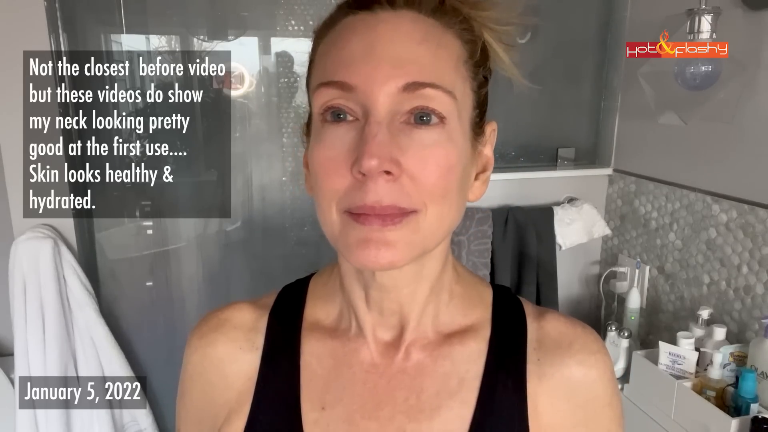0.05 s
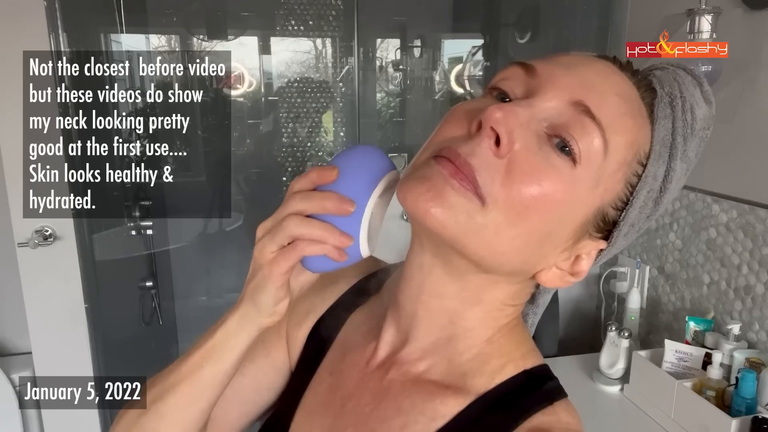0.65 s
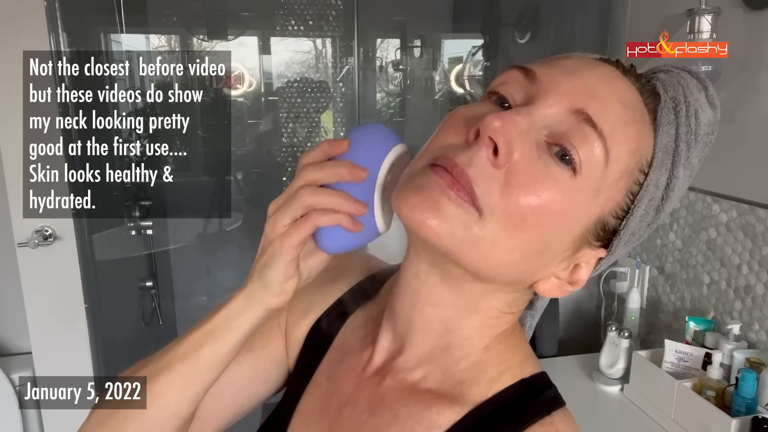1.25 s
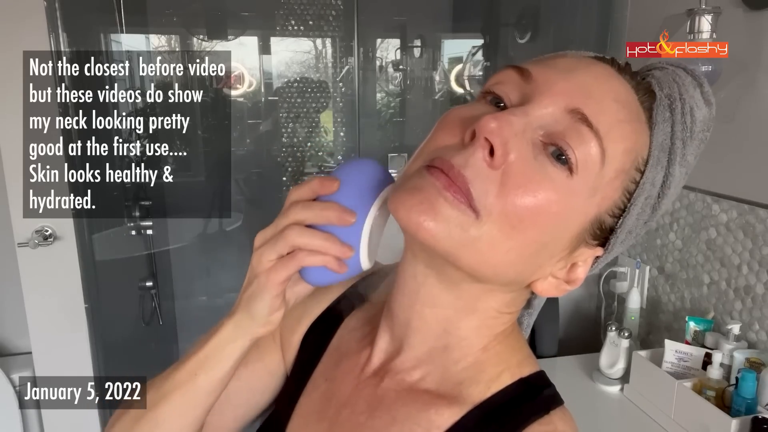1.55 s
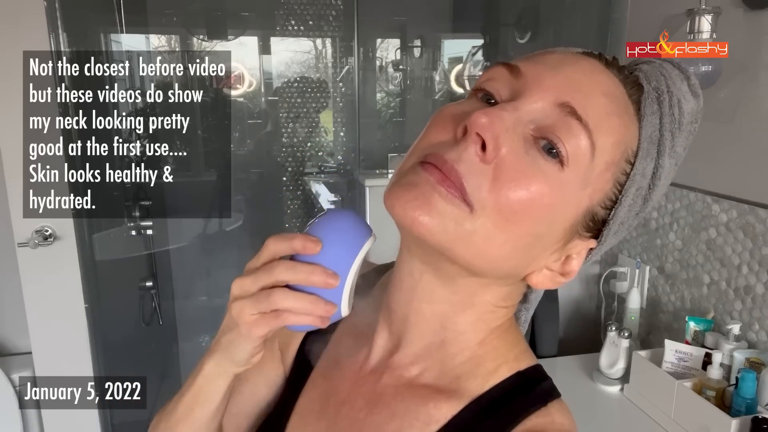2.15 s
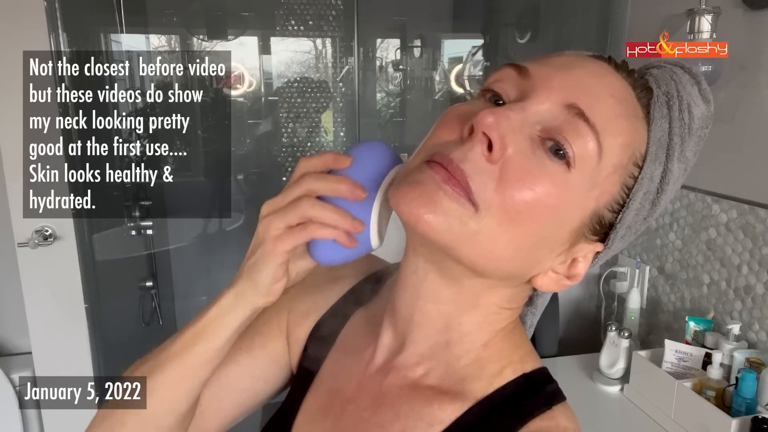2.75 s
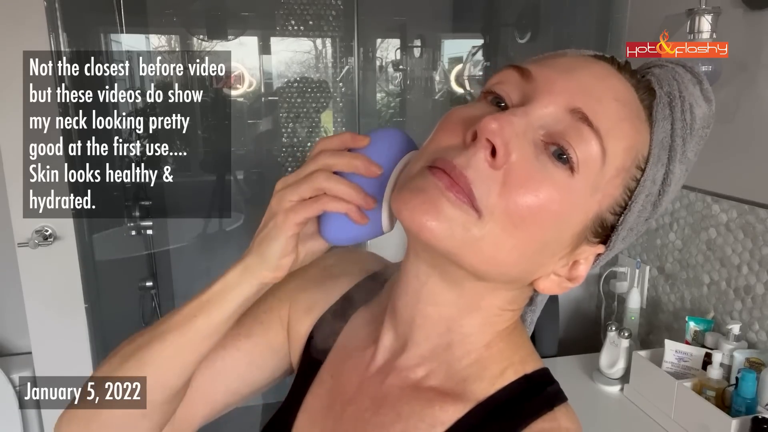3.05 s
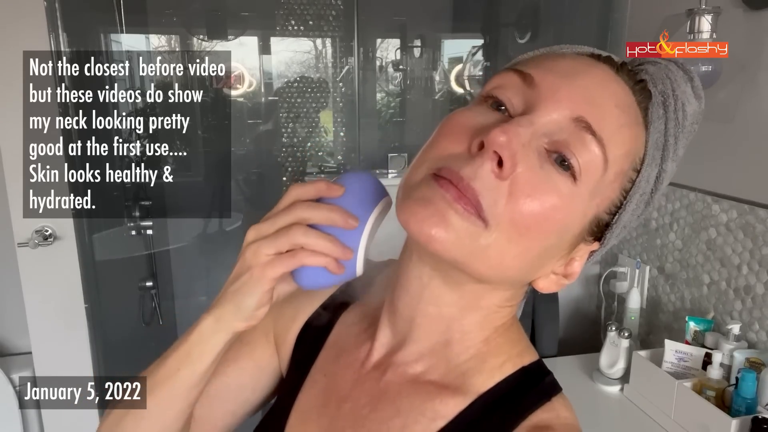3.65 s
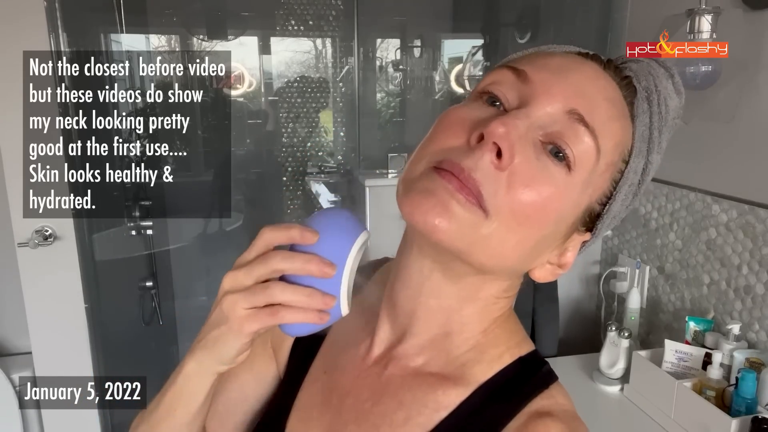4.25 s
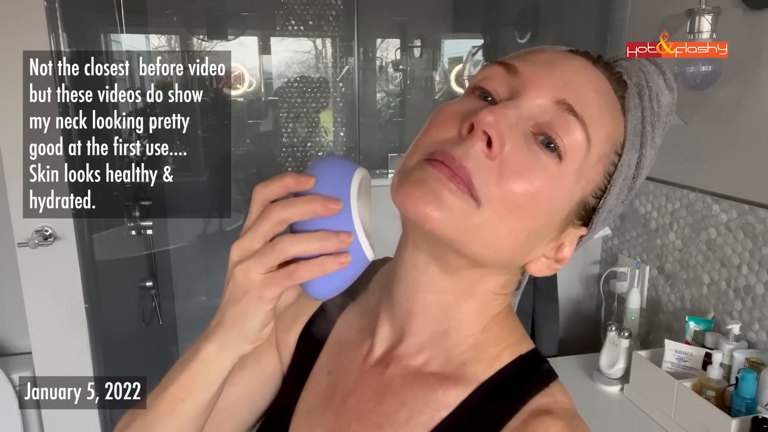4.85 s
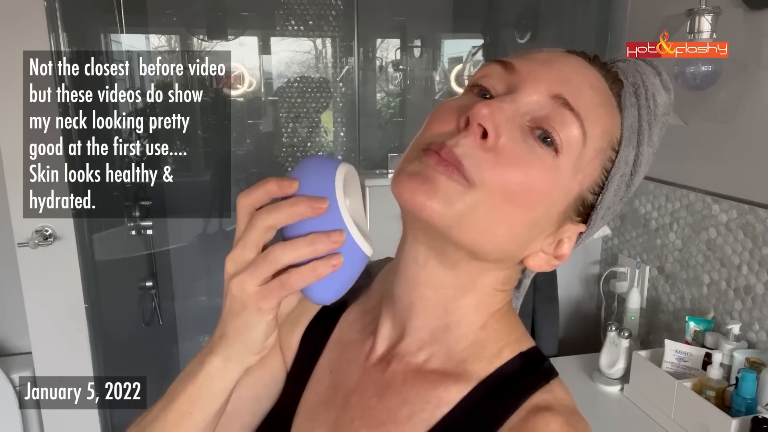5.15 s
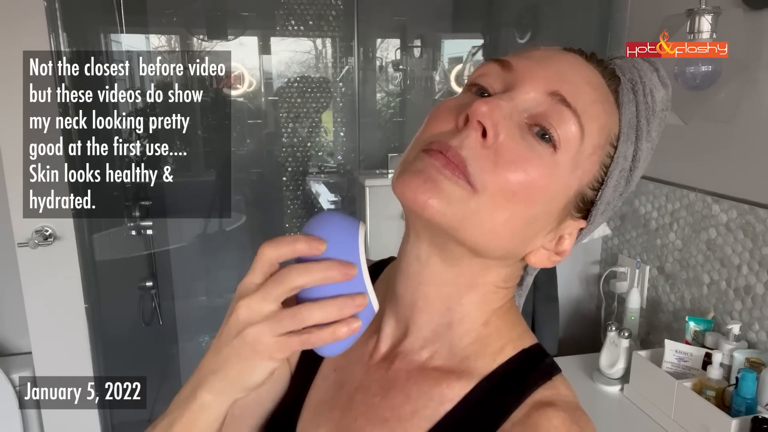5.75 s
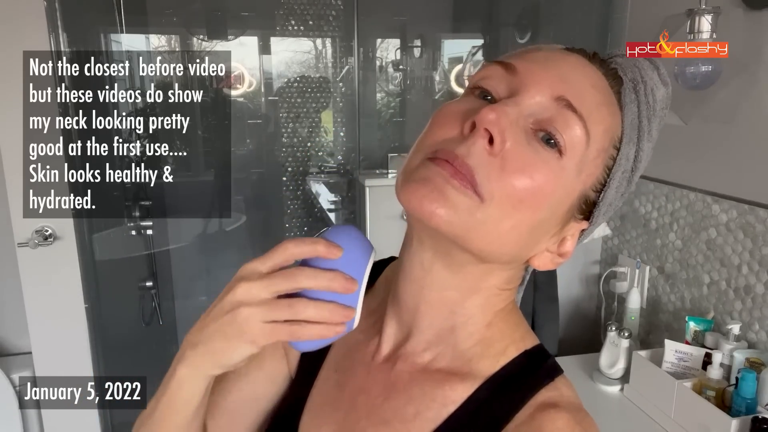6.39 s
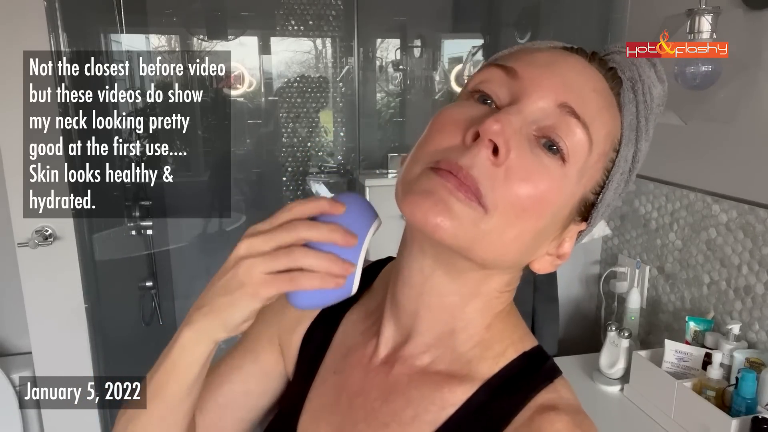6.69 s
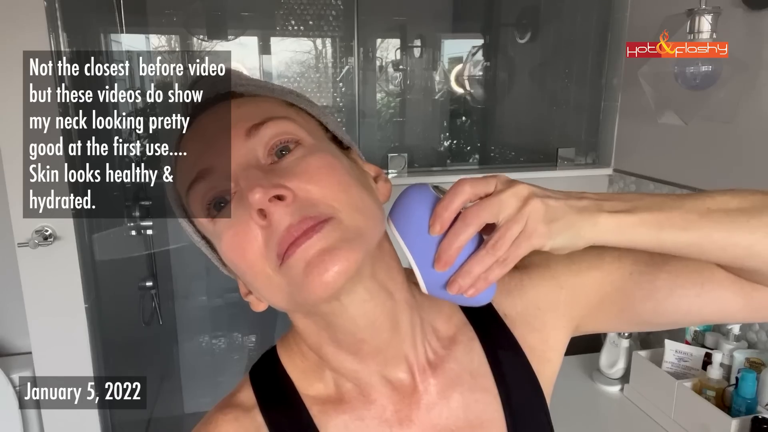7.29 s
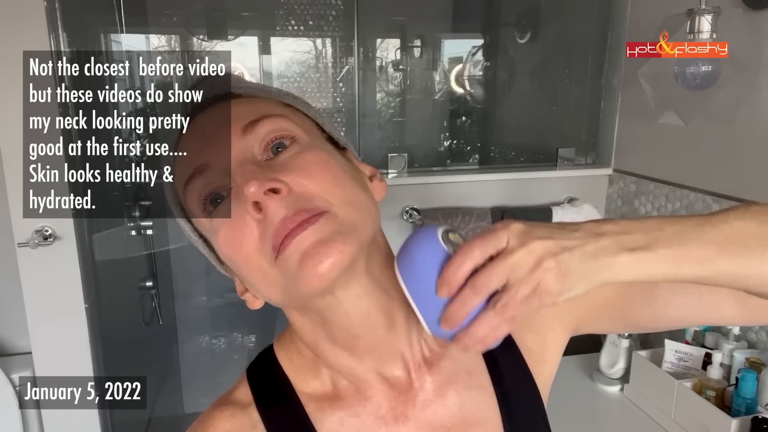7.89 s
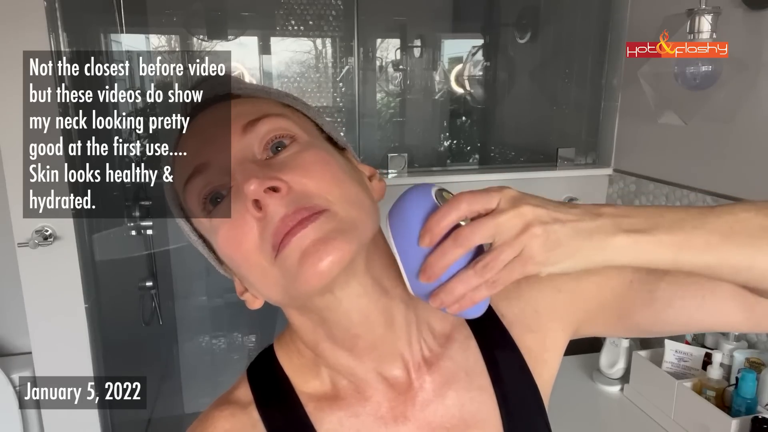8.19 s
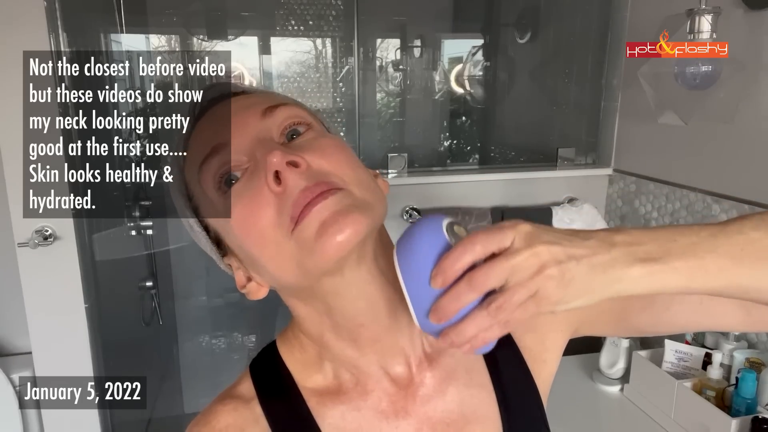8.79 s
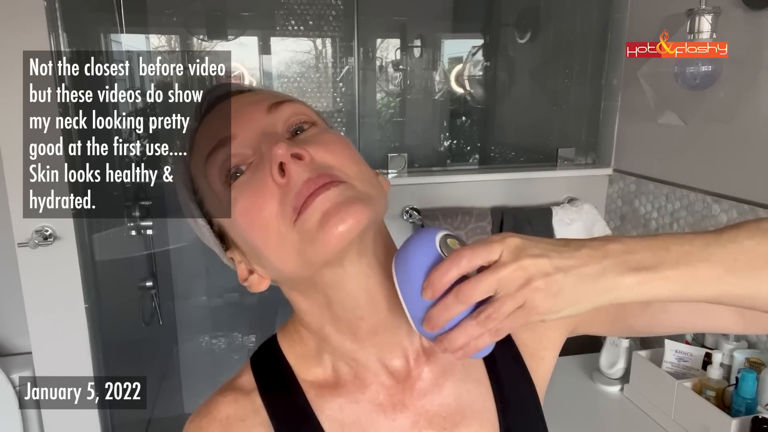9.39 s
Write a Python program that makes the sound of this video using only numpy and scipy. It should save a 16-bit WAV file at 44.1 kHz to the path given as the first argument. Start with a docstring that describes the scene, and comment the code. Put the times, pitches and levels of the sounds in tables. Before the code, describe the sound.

A faint bathroom hum and hiss is heard for a moment. At about 0.25 seconds a handheld skincare device switches on abruptly, close and slightly to the right. Its small pump makes a steady, low-pitched buzz rich in overtones, with a fine pulsing hiss, a high sizzle and a breathy whistle that slides a little. The pitch holds, but the tone keeps shifting as the device moves over the jaw and neck. Until about 3.5 seconds, short rasps of air escape where the rim lifts off the skin; softer flutters follow between 4.7 and 6.2 seconds. At about 6.9 seconds the buzz cuts out for an instant and quickly spins back up with a low flutter. It then sounds a little more nasal and ringing, with a few faint puffs of air, and keeps buzzing and hissing until the end at around 9.6 seconds.

```python
"""First comes the faint hum and hiss of a quiet bathroom, then a handheld skincare device starts to buzz.
It works along the jaw and neck on one side, breaks off for an instant, and goes on along the other.
Its small diaphragm pump makes about 83 strokes a second and puffs hissing air through two valves.
Air flutters and rasps past the rim wherever it lifts off the skin, and the buzz changes colour
as the hand moves."""
import sys
import numpy as np
from scipy import signal
from scipy.fft import rfft, irfft, next_fast_len
from scipy.io import wavfile
from scipy.ndimage import uniform_filter1d, map_coordinates

SR = 44100
rng = np.random.default_rng(int(sys.argv[2]) if len(sys.argv) > 2 else 0)


def to_wav(s):
    """Save 16-bit WAV."""
    ch = np.atleast_2d(s).T  # columns
    pcm = np.round(np.clip(ch, -1, 1) * 32767)  # PCM
    wavfile.write(sys.argv[1], SR, pcm.astype(np.int16))


N = 424683

START_S, FIRST_STROKE_S = .25, .253
BREAK_S, RESUME_S, FADE_IN_S = 6.856, 6.887, .09   # the second side begins at the break
SECOND_VALVE_DELAY = .46   # share of a stroke after which the second valve shuts
CASING_HZ = (1160, 2120, 3010, 4020)   # centres of the low mids, high mids, gap ring and treble

# the hum of the room: f/Hz, level/dB per Hz
ROOM_SPECTRUM = [(20, -86), (35, -82), (48, -80.5), (70, -71.5), (100, -82.5), (120, -73.5), (132, -80.5),
                 (150, -67.5), (180, -77), (250, -79.5), (305, -78), (370, -85), (520, -90), (1000, -95),
                 (3000, -101), (9000, -106), (15000, -115)]
# the faint hiss before the device starts: f/Hz, level/dB per Hz
OPENING_SPECTRUM = [(300, -100), (1000, -100), (2400, -86), (3600, -90.5), (4600, -87.5), (5500, -84.5),
                    (6100, -78.5), (7000, -87), (8200, -95), (9400, -88), (10200, -120)]
# colours of the nozzle's low hiss, high hiss and finest sizzle, each: f/Hz, relative level/dB
LOW_HISS_SPECTRUM = [(1500, 3), (3300, 11), (4300, 10), (5300, 14), (6050, 12.5), (6700, 8.5), (7600, -1),
                     (9000, -81)]
HIGH_HISS_SPECTRUM = [(6000, -15), (7600, -21), (8600, 5.5), (9600, 4.5), (10400, 5.5), (11200, -1.5),
                      (12500, -34), (15000, -50)]
SIZZLE_SPECTRUM = [(9000, -34), (11200, -2.5), (12300, 0.5), (13200, -2), (14400, 6.5), (14900, -32),
                   (15600, -7.5)]
# how loud the nozzle hisses: t/s, low hiss/dB, high hiss/dB
HISS_LEVELS = [(0.36, -48, -46.5), (0.65, -47.5, -48), (1.4, -47.5, -48.5), (1.95, -48, -47.5),
               (2.3, -45, -46), (3.1, -48, -50), (3.6, -47, -47.5), (4.3, -45.5, -48.5),
               (4.75, -47.5, -47.5), (5.35, -45, -46.5), (5.85, -47, -49), (6.2, -43.5, -48),
               (6.5, -46.5, -52), (6.85, -47.5, -48.5), (7.25, -44, -43), (7.55, -47.5, -47.5),
               (7.8, -47, -44), (8.28, -47.5, -49.5), (8.75, -44, -47), (9.1, -46.5, -48.5),
               (9.5, -45.5, -43)]
# how loud it sizzles: t/s, level/dB
SIZZLE_LEVELS = [(0.3, -51), (2.0, -50.5), (3.05, -51.5), (3.35, -56), (3.55, -51.5), (4.1, -54),
                 (4.7, -51.5), (5.6, -52.5), (6.02, -46), (6.35, -55), (6.85, -53), (7.15, -49), (7.9, -51),
                 (8.3, -52.5), (8.75, -49), (9.08, -54), (9.5, -45.5)]
# the jet of air narrows to a breathy whistle that slides with the gap: t/s, f/Hz, share of the mix/0-1
JET_WHISTLE = [(0.3, 5170, 0.2), (0.7, 5470, 0.54), (1.05, 5970, 0.2), (1.44, 5900, 0.64),
               (1.8, 5530, 0.35), (2.25, 5900, 0.6), (2.4, 5430, 0.2), (2.85, 5870, 1), (3.7, 5600, 0.04),
               (4.0, 5430, 0.34), (4.35, 5140, 0.33), (4.65, 5600, 0.1), (5.15, 5270, 0.1),
               (5.9, 5600, 0.02), (6.2, 6030, 0.63), (6.55, 6250, 0.6), (7.05, 5730, 0.64),
               (7.28, 5810, 0.9), (7.85, 6030, 0.45), (8.1, 5330, 0.46), (8.32, 5330, 0.75),
               (8.6, 6300, 0.4), (9.03, 6160, 0.44), (9.6, 5600, .35)]
# colours of the low flutter and of the rasp on each side, each: f/Hz, relative level/dB
FLUTTER_SPECTRUM = [(250, -24), (500, -8.5), (800, -2.5), (1200, -4), (1800, -2.5), (2500, -17.5),
                    (3500, -10.5), (4500, -21), (6000, -51), (9000, -46)]
FIRST_RASP_SPECTRUM = [(700, -11.5), (1500, -3), (2100, 6.5), (2700, 7), (3050, 5.5), (3400, -1.5),
                       (4200, -69), (7000, -49)]
SECOND_RASP_SPECTRUM = [(700, -22), (1500, -9), (2150, -2), (2450, -1), (2750, -4), (3100, -4), (3500, -14),
                        (7000, -40)]
# short bursts: middle t/s, length/s, flutter/dB, rasp/dB. The one at 6.934 s is a low flutter as the
# pump spins up after the break; in the others the rim lifts off the skin and air escapes
BURSTS = [(0.364, 0.21, -52, -44), (0.603, 0.13, -66, -47), (0.777, 0.21, -71, -45),
          (0.986, 0.15, -53, -41.5), (1.46, 0.14, -58, -40.5), (1.99, 0.14, -56, -42),
          (2.31, 0.16, -44, -42.5), (2.628, 0.051, -47, -44), (2.78, 0.16, -56, -41.5),
          (3.052, 0.25, -55, -40), (3.345, 0.27, -47, -48), (4.73, 0.074, -51, -58),
          (4.912, 0.16, -54, -50.5), (5.128, 0.21, -55, -53), (5.407, 0.18, -59, -53),
          (5.584, 0.16, -52, -56), (5.783, 0.15, -50, -55), (6.163, 0.13, -47.5, -54),
          (6.934, 0.12, -43, -70), (7.467, 0.044, -57, -62), (7.82, .1, -53, -53), (8.698, .25, -66, -63)]
# the nasal ring of the air between rim and skin: t/s, f/Hz, boost/dB
POCKET_RING = [(0.3, 2750, 0.5), (1.2, 2620, 4), (1.9, 2650, -2.5), (2.6, 2650, 5.5), (2.85, 2820, 3.5),
               (3.08, 2800, 5), (3.28, 2700, 3), (6.85, 2450, 2), (7.1, 2440, 7.5), (7.28, 2480, 11),
               (7.5, 2480, 8), (7.68, 2600, 5.5), (7.82, 2700, 5.5), (8.02, 2720, 4), (8.22, 2480, 6.5),
               (8.48, 2640, 7), (8.66, 2820, 8), (8.88, 2720, 8), (9.1, 2600, 3), (9.3, 2770, 6.5),
               (9.6, 2600, 5)]
# pump speed under its changing load: t/s, stroke rate/Hz
PUMP_SPEED = [(0.25, 83.6), (0.9, 83.85), (1.65, 83.5), (2.3, 83.3), (4.8, 83.5), (6.0, 83.33), (6.8, 83.5),
              (9.63, 83.4)]
# the buzz's harmonics (tones at whole multiples of the stroke rate):
# harmonic number, relative level on the first side/dB, on the second side/dB
BUZZ_HARMONICS = [(1, -47.5, -46.5), (2, -78.0, -69.0), (3, -66, -62.5), (4, -62.5, -60.0),
                  (5, -58.0, -56.0), (6, -55.0, -67.5), (7, -54.5, -53.0), (8, -55.0, -50.5),
                  (9, -49.0, -59.5), (10, -60.0, -58.0), (11, -54.5, -53.0), (12, -57.0, -56.5),
                  (13, -51.5, -54.0), (14, -57.5, -51.5), (15, -59.0, -60.5), (16, -53.0, -60.0),
                  (17, -61.0, -59.5), (18, -51.0, -61.0), (19, -56.5, -53.5), (20, -58.0, -52.5),
                  (21, -54.0, -60.5), (22, -56.5, -54.5), (23, -56.5, -56.0), (24, -58.0, -61.0),
                  (25, -56.0, -48.0), (26, -54.5, -48.5), (27, -58.0, -51.5), (28, -53.0, -48.5),
                  (29, -55.0, -54.0), (30, -54.5, -51.0), (31, -56.0, -56.0), (32, -54.5, -51.5),
                  (33, -55.0, -55.0), (34, -54.0, -55.0), (35, -60.5, -54.0), (36, -56.5, -52.0),
                  (37, -58.0, -59.5), (38, -60.0, -56.5), (40, -62.5, -60.0), (42, -65.0, -63.5),
                  (44, -63.5, -62.5), (48, -67.0, -59.0), (52, -66.0, -59.0), (57, -70.5, -68.0),
                  (64, -75.0, -71.5), (72, -81.0, -80.0)]
# hand and skin cover and uncover the casing: t/s, low mids/dB, high mids/dB, ring of the rim's gap/dB
GRIP = [(0.3, -3.0, -6.0, 1.5), (0.85, -6.5, -1.0, 3.5), (1.2, 1.0, 1.5, 9), (1.85, 3.5, 2.5, 4.5),
        (2.25, 3.5, 3.5, 1), (2.62, 1.0, 4.5, -0.5), (2.88, -1.0, 1.5, 7), (3.1, -2.0, 1.0, -3),
        (3.3, -0.0, -0.5, -9), (4.1, 4.0, -3.5, -2.5), (4.72, -3.0, 1.0, -12.5), (5.25, 4.5, -3.0, -7),
        (6.05, 3.0, -4.0, -9.5), (6.4, -3.0, -0.0, -13.5), (6.85, -2.0, 2.0, -13), (7, -5.0, -1.5, 0),
        (7.4, 1.0, 2.0, 0.5), (8.2, 1.5, 1.0, 1.5), (8.5, 1.5, -0.5, -1), (8.6, 0.0, -2.5, -4.5),
        (8.8, 0.5, -1.0, -4), (8.95, 2.5, 3.5, -3), (9.15, 2.5, 5.0, -1.5), (9.63, 1, -2.5, -2)]
# a harmonic swells or fades as the device moves through a standing wave (the room's loud and soft spots):
# middle t/s, length/s, harmonic number, change/dB
HARMONIC_SWELLS = [(0.6, 1.4, 15, 8.0), (0.65, 0.7, 10, 7.5), (0.8, 0.7, 12, 8.0), (0.9, 0.7, 34, -10.5),
                   (1.0, 0.7, 28, -13.5), (1.05, 1, 14, 9.5), (1.1, 0.7, 11, -9.5), (1.15, 0.5, 21, -11.0),
                   (1.25, 0.35, 15, 4), (1.35, 0.35, 23, -10.5), (1.4, 0.5, 18, -13.5),
                   (1.4, 0.7, 13, -18.5), (1.7, 0.5, 9, 3.5), (2.1, 1.4, 5, -9.0), (2.2, 0.25, 15, 9.0),
                   (2.2, 0.5, 13, 9.0), (2.3, 0.25, 7, -9.5), (2.3, 0.5, 8, 4.5), (2.35, 0.7, 11, 10.5),
                   (2.45, 0.3, 19, 6), (2.75, 0.5, 9, 5.5), (2.8, 0.5, 14, 8.5), (2.9, 0.25, 18, -10.0),
                   (2.9, 0.25, 22, 10.0), (2.9, 0.3, 34, 4), (3.0, 0.35, 15, 9.0), (3.05, 0.35, 8, -8.0),
                   (3.25, 0.25, 13, 6.0), (3.5, 1, 24, 10.0), (3.65, 0.7, 16, -9.5), (3.7, 1, 6, -6.5),
                   (3.8, 0.7, 11, 7.5), (3.85, 0.7, 7, -6.0), (3.9, 0.7, 19, 9.0), (4.2, 0.25, 31, 5),
                   (4.25, 0.4, 9, 3.5), (4.3, 0.5, 18, -7.5), (4.5, 0.22, 30, 7), (4.6, 0.25, 21, 6),
                   (5.15, 1.4, 31, 7.0), (5.4, 1, 15, -10.5), (5.5, 1, 11, -10.0), (5.5, 1, 18, -18.0),
                   (5.65, 0.5, 13, -9.0), (5.7, 0.7, 12, -13.5), (5.7, 1, 22, 9.0), (5.85, 0.35, 28, 10.5),
                   (5.95, 1.4, 8, -8.0), (6.55, 0.5, 26, 6), (6.6, 0.5, 9, 2.5), (6.65, 0.7, 11, 5.0),
                   (6.95, 1, 28, -9.5), (7.0, 1, 22, -12.0), (7.1, 1, 12, 6.0), (7.25, 1, 21, 7.0),
                   (7.3, 0.5, 18, 10.0), (7.35, 0.35, 32, -10.5), (7.4, 0.7, 25, -8.5),
                   (7.5, 0.7, 13, -12.0), (8.65, 0.25, 26, -9.0), (8.75, 0.25, 32, 6.0),
                   (9.05, 0.35, 27, -9.5), (9.1, 1, 34, 7.0), (9.5, 0.5, 25, 6)]
# no two valve slaps ring alike: f/Hz, share of a harmonic that changes by chance/0-1
SLAP_CHATTER = [(600, .03), (1400, .06), (2400, .15), (3200, .24), (4500, .26)]
# the tiled walls send each strong harmonic from a direction of its own: harmonic number,
# left minus right/dB and left lead/rad on the first side, then the same two on the second side
WALL_DIRECTIONS = [(5, 4.5, 0.4, 1.0, -0.5), (6, -1.5, 0.3, 2.0, -0.3), (7, -3.0, 0.4, -3.5, 2.3),
                   (8, 0.0, -2.3, -0.5, -0.1), (9, -1.5, 0.0, 3.5, -0.8), (10, -3.0, 0.7, 8.0, 1.1),
                   (11, 3.0, -0.3, 9.0, -2.5), (12, -2.0, 0.6, -1.0, -0.3), (13, 8.5, 1.2, 5.0, 2.1),
                   (14, -8.5, 0.4, -14.0, 0.0), (15, -2.0, -0.2, 0.5, 0.6), (16, -5.0, -0.3, 1.5, -0.9),
                   (17, 0.0, 0.3, 0.5, 0.7), (18, -2.5, -0.7, -8.0, -3.0), (19, 1.5, 0.6, 2.5, 0.9),
                   (20, -1.5, -0.3, -2.0, -0.1), (21, 4.5, 0.2, -3.5, -0.1), (22, 3.0, -0.9, 0.5, 2.1),
                   (24, 2.0, 1.6, 1.5, -0.3), (25, 0.5, 0.2, 3.0, 2.3), (26, 3.5, -0.5, 1.0, -1.5),
                   (27, 1.0, -0.2, -1.0, 0.3), (28, -1.5, 0.1, 0.5, -0.2), (29, -4.0, 0.7, -1.5, 2.9),
                   (30, 0.5, 0.2, 0.0, -0.5), (31, -2.0, 0.0, -2.0, 1.2), (32, -1.0, 0.3, 0.5, -0.1),
                   (34, -4.5, 0.6, -1.5, -1.5)]
# a phone-like stereo image shifts the phase between left and right: f/Hz, left lead/rad
STEREO_PHASE = [(20, 0), (300, 0), (520, .4), (780, -1.3), (1030, .3), (1460, -1.2), (2500, -2.3),
                (3100, -1.8), (3800, -3.1), (4740, -3.2), (5700, -4.6), (7000, -3.4), (8700, -2.7),
                (11100, -.1), (12300, 0), (13300, 1.5), (14500, 2.9), (15400, 3.14)]
# the device sounds a little to the right: f/Hz, left minus right/dB
STEREO_BALANCE = [(60, -3), (150, 1), (400, -4.5), (700, -2.5), (1300, 0), (2400, -1.5), (4400, -5),
                  (8000, -1), (12000, 0)]


def from_db(db):
    """Turn decibels into a gain to multiply by."""
    return 10 ** (np.asarray(db) / 20)


def rms_one(x):
    """Scale a signal so that its average strength (rms) is 1."""
    return x / np.sqrt(np.mean(x ** 2) + 1e-20)


def read(rows, at):
    """Look up a table by its first column, joining the rows with straight lines."""
    first, *columns = np.transpose(rows)
    return [np.interp(at, first, column) for column in columns]


def at_hz(points, hz):
    """Look up a table by frequency, with every octave equally wide."""
    f, value = np.transpose(points)
    return np.interp(np.log(hz + 1), np.log(f), value)


def drift(per_s, t, count=1):
    """Smooth random curves of spread 1, one to a row."""
    knots = rng.standard_normal((count, 600))
    return rms_one(np.array([map_coordinates(row, [t * per_s], order=3, mode="mirror") for row in knots]))


def hump(t, centre, length):
    """A smooth rise and fall of height 1, half as high at the ends of its length."""
    return .5 ** ((2 * (t - centre) / length) ** 2)


def noise(spectrum, likeness, gate=1):
    """Stereo noise, chopped by a gate and then coloured; likeness 1 makes left and right the same."""
    mid, side = rng.standard_normal((2, N))
    white = np.sqrt(1 + likeness) * mid + np.sqrt(1 - likeness) * side * [[1], [-1]]
    size = next_fast_len(N)
    colour = from_db(at_hz(spectrum, np.fft.rfftfreq(size, 1 / SR)))
    return irfft(rfft(white * gate, size) * colour, size)[:, :N] * np.sqrt(SR) / 2


def resonance(x, hz, width_hz):
    """The part of a sound that rings around a moving pitch; gain 1 at that pitch."""
    turn = np.exp(2j * np.pi * np.cumsum(hz) / SR)
    decay = np.exp(-np.pi * width_hz / SR)
    return 2 * np.real(turn * signal.lfilter([1 - decay], [1, -decay], x * turn.conj()))


def break_dip(t):
    """A gain that drops almost to nothing at the break, then swells back to 1."""
    fade_out = np.clip((BREAK_S - t) / .003, 0, 1)
    fade_in = np.clip((t - RESUME_S) / FADE_IN_S, .04, 1)
    return np.maximum(fade_out, fade_in)


def bathroom(t, running):
    """A low hum that dips briefly at the break, and a faint hiss until the device starts."""
    hum = noise(ROOM_SPECTRUM, likeness=.75) * np.maximum(break_dip(t), .7)
    return hum + noise(OPENING_SPECTRUM, likeness=.24) * (1 - running)


def puffs(strokes, width, second, steady, uneven_db=0):
    """Two puffs a stroke over a steady flow; width is in strokes, second and steady are power weights."""
    power = steady
    for delay, share in ((0, 1), (SECOND_VALVE_DELAY, second)):
        turn = strokes - delay + 1
        age = turn % 1 / width
        strength = from_db(uneven_db * rng.standard_normal(1000))
        puff = strength[turn.astype(int)] * age * np.exp(1 - age)
        power = power + share * puff ** 2
    return rms_one(np.sqrt(power))


def whistle(hiss, hz, share):
    """Narrow part of a hiss to a breathy, sliding whistle."""
    ringing = rms_one(resonance(hiss, hz, width_hz=600))
    return rms_one((1 - share) * rms_one(hiss) + share * ringing)


def nozzle(t, strokes):
    """Air leaves the nozzle in time with the pump: two whistling hisses and a fine sizzle."""
    low_waver_db, high_waver_db = .8 * drift(8.7, t, count=2)   # the flow wavers by chance
    low_db, high_db = read(HISS_LEVELS, t)
    sizzle_db, = read(SIZZLE_LEVELS, t)
    low_hz, low_share = read(JET_WHISTLE, t)
    high_hz = 10000 + 210 * drift(6, t)[0]
    second = np.where(t < BREAK_S, .65, .22)   # the second valve is fainter on the second side
    low = noise(LOW_HISS_SPECTRUM, .34, puffs(strokes, .15, second, steady=.39, uneven_db=2.5))
    high = noise(HIGH_HISS_SPECTRUM, .92, puffs(strokes, .063, second, steady=.16, uneven_db=2))
    sizzle = noise(SIZZLE_SPECTRUM, .92, puffs(strokes, .074, second, steady=.27, uneven_db=3.5))
    return (from_db(low_db + low_waver_db) * whistle(low, low_hz, low_share)
            + from_db(high_db + high_waver_db) * whistle(high, high_hz, share=.38)
            + from_db(sizzle_db) * rms_one(sizzle))


def flutter_and_rasp_gains(t):
    """Air always seeps past the rim; short bursts add to that steady level."""
    ring_db = read(GRIP, t)[-1]
    flutter_power = from_db(np.where(t < BREAK_S, -54, -56.5)) ** 2
    rasp_power = from_db(-53.5 + .42 * ring_db) ** 2   # the rasp grows with the ring of the gap
    for centre, length, flutter_db, rasp_db in BURSTS:
        near = np.abs(t - centre) < 2 * length
        burst = hump(t[near], centre, length)
        flutter_power[near] += burst * from_db(flutter_db) ** 2
        rasp_power[near] += burst * from_db(rasp_db) ** 2
    return np.sqrt(flutter_power), np.sqrt(rasp_power)


def flutter_and_rasp(t, strokes):
    """Each stroke forces air between rim and skin; the spin-up after the break adds a low flutter."""
    flutter_gain, rasp_gain = flutter_and_rasp_gains(t)
    flutter = noise(FLUTTER_SPECTRUM, .041, puffs(strokes, width=.039, second=.9, steady=.42))
    rasp_puffs = puffs(strokes, width=.07, second=.5, steady=.28, uneven_db=2)
    first_rasp = rms_one(noise(FIRST_RASP_SPECTRUM, .44, rasp_puffs))
    second_rasp = rms_one(noise(SECOND_RASP_SPECTRUM, .2, rasp_puffs))
    return flutter_gain * rms_one(flutter) + rasp_gain * np.where(t < BREAK_S, first_rasp, second_rasp)


def air_pocket(t, x):
    """The air trapped under the rim rings after each stroke, at a pitch that shifts with the hand."""
    hz, boost_db = read(POCKET_RING, t)
    return x + (from_db(boost_db) - 1) * resonance(x, hz, width_hz=280)


def wall_directions(orders, frames):
    """The walls give each harmonic its own level and phase left and right; total power stays the same."""
    gains = np.ones((2, len(orders), len(frames)), complex)
    half = np.array([[.5], [-.5]])
    for order, first_db, first_lead, second_db, second_lead in WALL_DIRECTIONS:
        pan = from_db(half * np.where(frames < BREAK_S, first_db, second_db))
        lead = np.where(frames < BREAK_S, first_lead, second_lead)
        gains[:, round(order) - 1] = pan / np.sqrt(np.mean(pan ** 2, axis=0)) * np.exp(1j * half * lead)
    return gains


def buzz_colour(orders, hz, frames):
    """Each harmonic's level in dB over time, shaped by the grip and by standing waves."""
    first_db, second_db = read(BUZZ_HARMONICS, orders)
    level_db = np.where(frames < BREAK_S, first_db[:, None], second_db[:, None])
    low_db, high_db, ring_db = read(GRIP, frames)
    treble_db = -1.5 + low_db - .8 * ring_db
    for band, grip_db in zip(np.eye(6)[1:5], (low_db, high_db, ring_db, treble_db)):
        level_db += np.interp(hz, [400, *CASING_HZ, 6000], band)[:, None] * grip_db
    for centre, length, order, swell_db in HARMONIC_SWELLS:
        level_db[round(order) - 1] += swell_db * hump(frames, centre, length)
    return level_db


def casing_lag(level_db):
    """Each harmonic's lag in radians: the casing rings after a slap, never before (minimum phase)."""
    log_gain = uniform_filter1d(np.log(from_db(level_db)), size=2, axis=0)
    mirrored = np.vstack([log_gain[:1], log_gain, log_gain[-2::-1]])
    return signal.hilbert(mirrored, axis=0).imag[1:len(level_db) + 1]


def slap_chatter(hz, frames):
    """Each slap rings a little differently: quick random changes in level and phase."""
    share = at_hz(SLAP_CHATTER, hz)[:, None]
    jitter = rng.standard_normal((2, len(hz), len(frames)))
    real, imaginary = rms_one(uniform_filter1d(jitter, size=3, axis=1))
    return np.sqrt(1 - share ** 2) + share * (real + 1j * imaginary) / np.sqrt(2)


def pump_strokes(t, spin_up_s=.042):
    """Count the strokes so far: the pump runs slow at each start, then quickly catches up."""
    rate_hz, = read(PUMP_SPEED, t)
    since_start = np.maximum(t - np.where(t < BREAK_S, START_S, BREAK_S), 0)
    slow_by_hz = np.where(t < BREAK_S, 4.022, 22.33) * np.exp(-since_start / spin_up_s)
    turns = np.cumsum(rate_hz - slow_by_hz) / SR
    return turns - np.interp(FIRST_STROKE_S, t, turns) % 1


def pump(t, strokes, count=72, moves_per_s=3.2, cycle_size=1024):
    """Two valves slap the casing once each a stroke; echoes shift every harmonic as the hand moves."""
    frames = np.arange(0, t[-1] + 1, 1 / 100)   # the tone is updated 100 times a second
    orders = np.arange(1, count + 1)
    hz = orders * PUMP_SPEED[-1][1]
    level_db = buzz_colour(orders, hz, frames)
    lag = casing_lag(level_db)
    valves = 1 + .4 * np.exp(-2j * np.pi * orders * SECOND_VALVE_DELAY)[:, None]
    # the upper harmonics wander most as the hand moves, and flicker as it trembles
    wander_db = 1.2 * np.interp(hz, [0, 700, 1600, 2600, 4000], [.1, .3, .7, 1.3, 1])[:, None]
    shared_drift = drift(moves_per_s, frames, count)
    flicker_db = 1.2 * np.clip(hz / CASING_HZ[1], 0, 1)[:, None] ** 2
    level_db += flicker_db * drift(9, frames, count)
    chatter = slap_chatter(hz, frames)
    echoes = drift(moves_per_s, frames, count) + 1j * drift(moves_per_s / 2, frames, count)
    echo_gain = .5 * np.minimum(hz / 700, 1)[:, None]
    position = [strokes % 1 * cycle_size, t / frames[1]]   # where in the stroke, and in which frame
    channels = []
    for direction in wall_directions(orders, frames):
        own_drift = drift(moves_per_s, frames, count)
        arrival = valves + echo_gain * (echoes + 1j * np.sqrt(2) * own_drift)
        gain = from_db(level_db + wander_db * (shared_drift + own_drift) / np.sqrt(2))
        harmonics = direction * chatter * gain * np.exp(1j * (np.angle(arrival) - lag))
        # build one stroke's wave for each frame, then play it at the pump's speed
        spectrum = np.vstack([np.zeros(len(frames)), harmonics])
        cycles = irfft(spectrum, cycle_size, axis=0) * cycle_size / np.sqrt(2)
        channels.append(map_coordinates(cycles, position, order=1, mode="grid-wrap"))
    return np.array(channels)


def scene():
    """The quiet room, then the device, with one short break as it changes sides."""
    t = np.arange(N) / SR
    strokes = pump_strokes(t)
    buzz = from_db(-1.96) * pump(t, strokes)
    device = air_pocket(t, buzz + flutter_and_rasp(t, strokes)) + nozzle(t, strokes)
    running = np.clip((t - START_S) / .0022, 0, 1)
    return device * running * break_dip(t) + bathroom(t, running)


def record(dry):
    """A phone-like stereo image: left and right differ in phase and level by frequency; the top is cut."""
    size = next_fast_len(N + SR)
    hz = np.fft.rfftfreq(size, 1 / SR)
    half = np.array([[.5], [-.5]])
    phase_shift = np.exp(1j * at_hz(STEREO_PHASE, hz) * half)
    balance = from_db(at_hz(STEREO_BALANCE, hz) * half)
    low_pass = np.clip((15750 - hz) / 100 + .5, 0, 1)
    return irfft(rfft(dry, size) * phase_shift * balance * low_pass, size)[:, :N]


dry = scene()
out = record(dry)
to_wav(out)
```